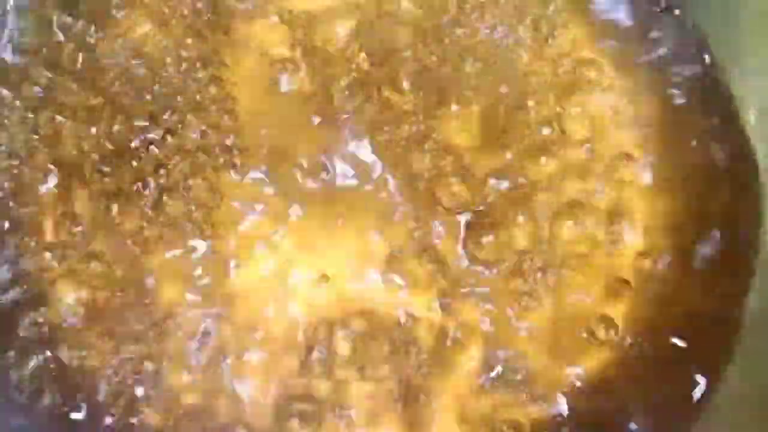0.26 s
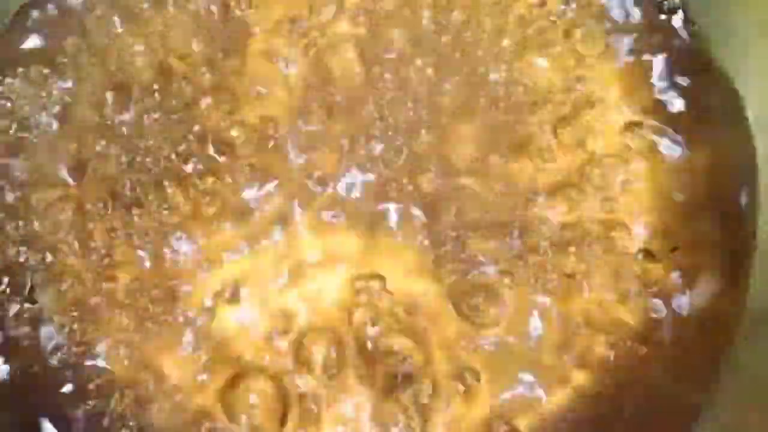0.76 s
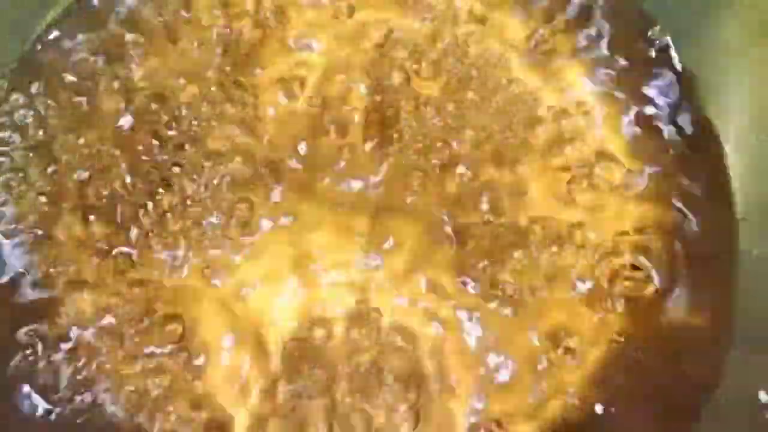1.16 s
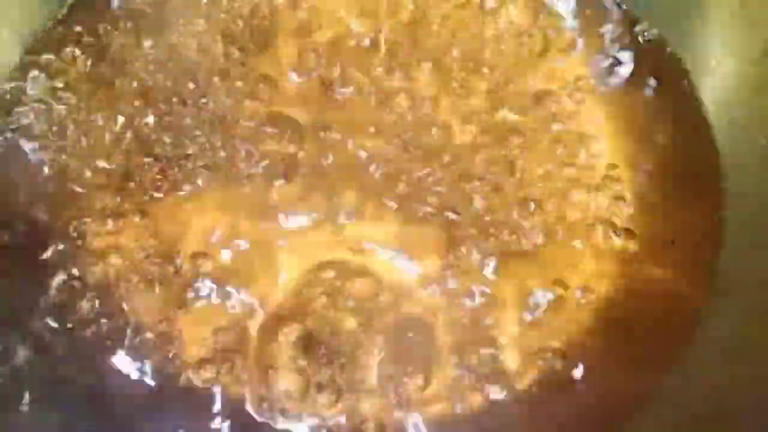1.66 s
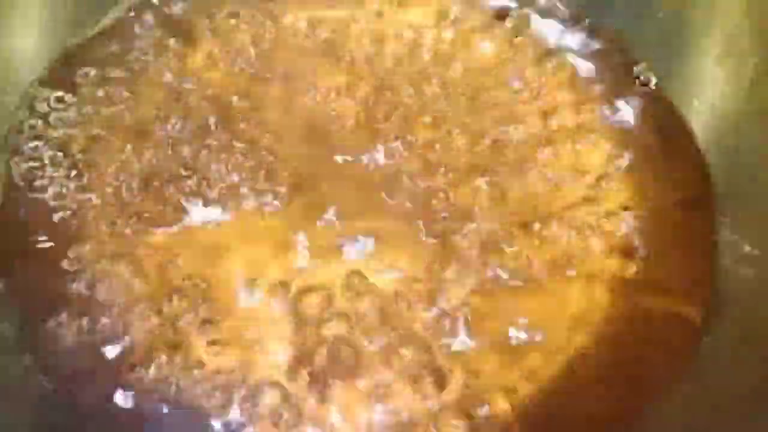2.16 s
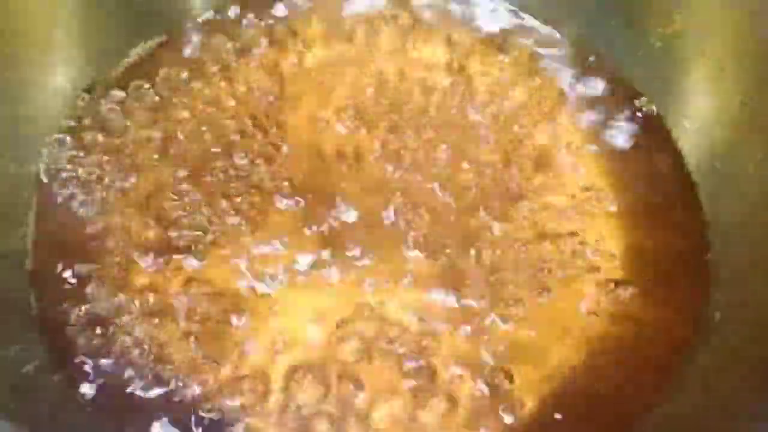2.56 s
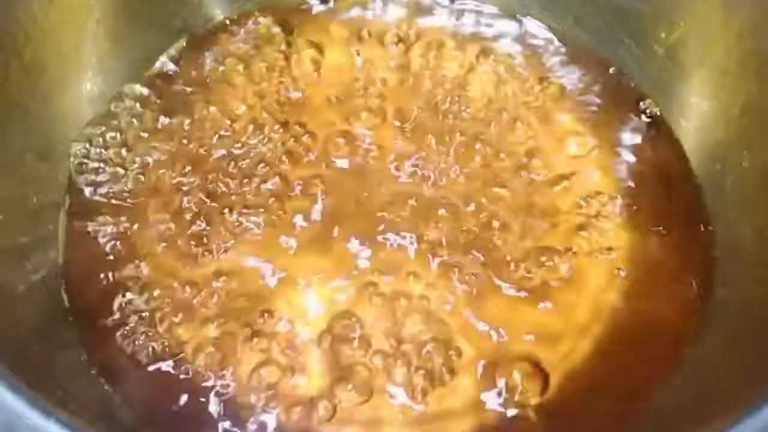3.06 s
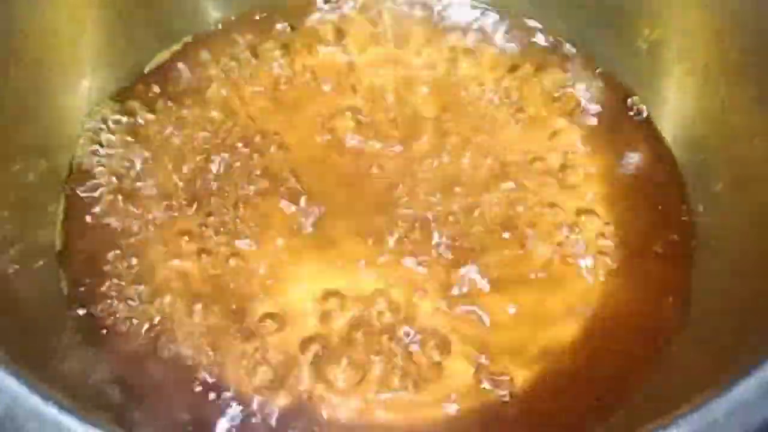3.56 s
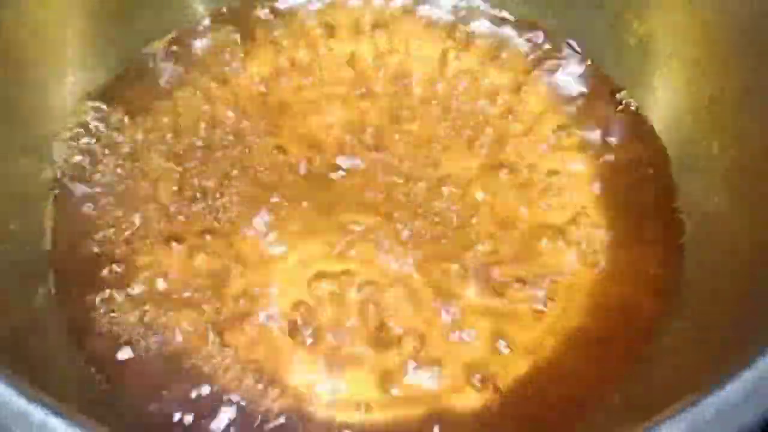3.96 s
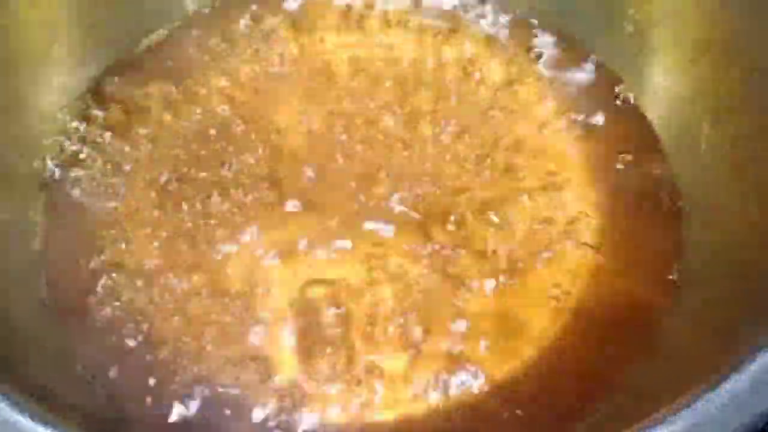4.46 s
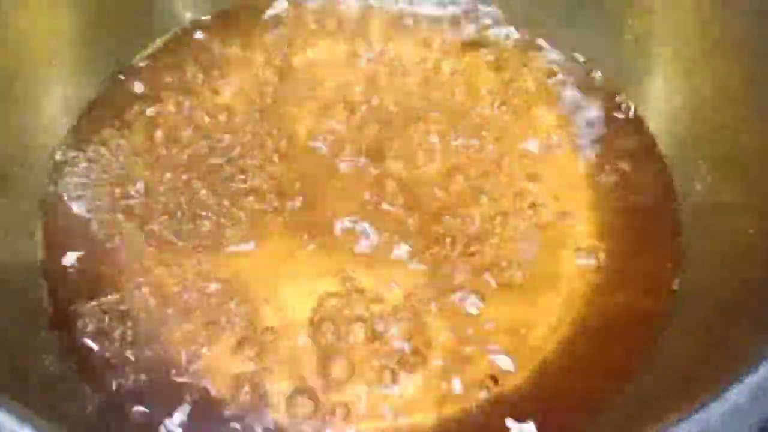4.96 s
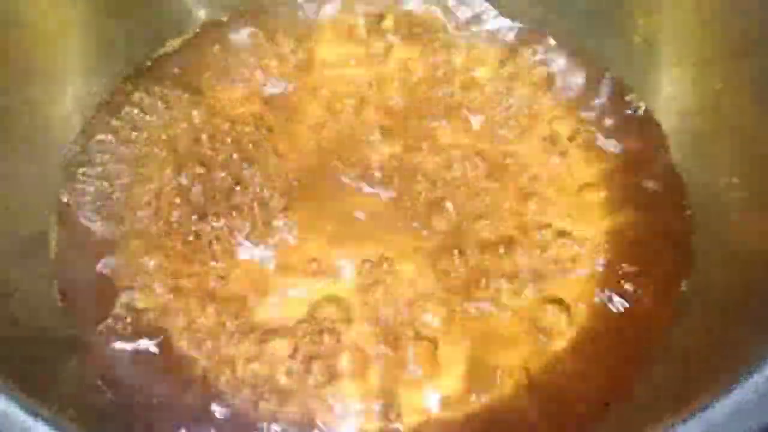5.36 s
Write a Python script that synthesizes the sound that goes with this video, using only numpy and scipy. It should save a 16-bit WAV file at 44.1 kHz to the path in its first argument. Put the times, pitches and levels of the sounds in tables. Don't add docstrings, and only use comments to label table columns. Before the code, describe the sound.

A vigorous sugar boil runs throughout: sizzling fizz, uneven and crackly, with soft low bubbling beneath. After almost five seconds come two quick metallic hits and a scraping drag, bright and ringing; then the boil returns with a faint falling squeak. Dry, near stereo phone sound, the right side hissier and briefly ducked by the hits.

```python
import sys
import numpy as np
from scipy import signal
from scipy.fft import rfft, irfft, next_fast_len
from scipy.io import wavfile
from scipy.ndimage import uniform_filter1d

SR = 44100
rng = np.random.default_rng(int(sys.argv[2]) if len(sys.argv) > 2 else 0)


def volts_from_db(level):
    exponent = np.asarray(level, float) / 20
    return 10 ** exponent


def master(y):
    cut = np.clip(np.atleast_2d(y).T, -1, 1)
    pcm = np.round(cut * 32767)
    wavfile.write(sys.argv[1], SR, pcm.astype(np.int16))


N = 246959
TIME = np.arange(N) / SR

# (time [s], level [dB])
HEAT = [(0, 0), (.6, 0.25), (1.9, -0.9), (2.6, 0), (3.1, -0.47), (4.2, 0.4), (4.7, 1.3), (5.6, 1)]
# (time [s], fizz [dB], rumble [dB])
SURGES = [(0.116, -0.5, -4.5), (0.169, 3, 4), (0.232, -1.5, 1), (0.428, -2.5, 1), (0.532, 3, 3),
          (0.605, -3.5, -3), (0.654, 3.5, 0.5), (0.783, 3, -3), (1.004, -2, -2), (1.133, 4, 0.7),
          (1.435, 2.5, 1.5), (1.559, -1.5, 1), (2.32, -2.5, -1), (2.53, 1.3, -0.5), (2.641, 3.5, 1.3),
          (3.062, 4, 4), (3.124, -2, -1), (3.185, 1.7, 0.5), (3.384, -2, 0), (3.551, 4, 3.5),
          (3.799, -3, -2.5), (3.847, 4.5, 5.5), (4.027, -1.5, -2.5), (4.174, -1.5, -2.5), (4.267, 3.5, 2.5),
          (4.383, 1.6, 0), (4.44, -2, -0.5), (4.513, -1.8, 6), (4.607, 4, -1.5), (4.69, -1.5, -7.5)]
SURGE_S = 0.011


def evened(x):
    return x / np.sqrt(np.mean(x ** 2, axis=-1, keepdims=True) + 1e-20)


def read(points, hz, order=1):
    table = np.transpose(points)
    return np.interp(np.log(hz + 1), np.log(table[0] + 1), table[order])


def along(rows):
    return np.interp(TIME, *np.transpose(rows))


def colour(x, gain_db):
    size = 4096
    hz = abs(np.fft.fftfreq(size, 1 / SR))
    log_gain = np.log(volts_from_db(np.maximum(gain_db(hz), -150)))
    taps = np.fft.ifft(np.exp(log_gain - 1j * signal.hilbert(log_gain).imag)).real
    return signal.oaconvolve(x, taps * np.sqrt(SR / 2))[:len(x)]


def flutter(low_hz, high_hz):
    t = TIME[::64]
    hz = np.geomspace(low_hz, high_hz, num=40)[:, None]
    waves = np.sin(2 * np.pi * (hz * t + rng.random(hz.shape))) * hz ** -.3
    return np.interp(TIME, t, evened(waves.sum(0)))


def bumps(s, db, width_s):
    t = TIME[::64]
    return np.interp(TIME, t, db @ np.exp(-.5 * ((t - s[:, None]) / width_s) ** 2))


def clicks(per_s, spread_db, wash, size=N):
    big = volts_from_db(spread_db * np.minimum(rng.exponential(1, size), 5)) * rng.choice([-1., 1.], size)
    bursts = evened(big * (rng.random(size) < per_s / SR))
    return np.sqrt(1 - wash) * bursts + np.sqrt(wash) * rng.standard_normal(size)


def blips(per_s, db):
    out = np.zeros(N)
    for hz in np.geomspace(250, 1500, num=10):
        cycles = hz * np.arange(round(7 * SR / hz)) / SR
        shape = np.sin(2 * np.pi * cycles * (1 + 0.036 * cycles)) * cycles * np.exp(-cycles / 1.15)
        shape /= np.linalg.norm(shape)
        out += signal.oaconvolve(clicks(per_s / 10, 2.3, 0), shape)[:N] * np.sqrt(hz)
    return volts_from_db(db) * evened(out)


def boil():
    # (frequency [Hz], density [dB per Hz])
    boil_left = [(30, -97), (70, -95), (130, -79), (200, -83.5), (280, -80.5), (450, -76), (540, -81.5),
                 (720, -78.5), (950, -77.5), (1150, -83), (1400, -81), (1700, -82.5), (2000, -96.5)]
    boil_right = [(30, -97), (70, -90.5), (130, -77.5), (200, -80.5), (280, -83.5), (450, -76),
                  (540, -76.5), (720, -80.5), (950, -78.5), (1150, -82), (1400, -82), (1700, -92.5),
                  (2000, -87)]
    # (frequency [Hz], correlation [-1..1])
    likeness = [(60, .9), (130, 0.85), (290, 1), (640, 0.98), (1410, .6), (3100, 0.092), (6820, 0.01),
                (15000, -0.1)]
    # (frequency [Hz], width [Hz], left lift [dB], right lift [dB])
    hollows = [(131.3, 13, 3, -3.5), (266.7, 30, 8.5, 9), (345.3, 16, 8, 9.5), (378, 7.8, 10, 10),
               (601.5, 13, 11.5, 1), (643, 22, 9.5, 0.5), (822, 47, 5.5, 7), (1514.4, 24.4, -2.5, 20),
               (1539, 14, 11.5, 3.5)]
    # (time [s], level [dB])
    small_bubbles = [(0, 4.5), (2, 3), (3.5, -3.5), (5.25, -3), (5.6, 2)]
    # (time [s], level [dB])
    heaves = [
        (0.0, 4),
        (.045, -3),
        (.69, 3),
        (1.051, 6),
        (3.501, 4.5),
        (4.51, -2),
    ]
    heave_s, churn_follows, port_lag_n = 0.0086, 0.67, 8
    hop, size = 256, 2048
    frames, hz = N // hop + 10, np.fft.rfftfreq(size, 1 / SR)[:160]

    a, b, c, d, patches = rng.standard_normal((frames, len(hz), 5)).T
    patches = uniform_filter1d(uniform_filter1d(patches, size=8, axis=0), size=10, axis=1)
    small_db = np.interp((np.arange(frames) - 4) * hop / SR, *np.transpose(small_bubbles))
    small_db = small_db * np.exp(-(np.log(hz[:, None] / 720 + 1e-9) / 0.2) ** 2)
    same, left = np.clip(read(likeness, hz), -1, 1)[:, None], a + 1j * b
    right = same * left + np.sqrt(1 - same ** 2) * (c + 1j * d)
    z = np.array([left, right]) * volts_from_db(0.72 * patches / patches.std() + small_db)
    z = np.pad(z, ((0, 0), (0, size // 2 + 1 - len(hz)), (0, 0)))
    noise = signal.istft(z, nperseg=size, noverlap=size - hop)[1][:, :N]
    white = (evened(noise) + blips(150, db=-8.5)) * np.sqrt(hz[-1] / (SR / 2))
    white[1] = np.roll(white[1], port_lag_n)

    s, _, surge_db = np.transpose(SURGES)
    churn_db = churn_follows * along(HEAT) + bumps(s, surge_db, SURGE_S)
    churn_db += bumps(*np.transpose(heaves), heave_s)
    white = white * volts_from_db(churn_db + .5 * flutter(4, 30))

    ports, size = [], next_fast_len(N)
    f = np.fft.rfftfreq(size, 1 / SR)
    for k, table in enumerate((boil_left, boil_right)):
        lift_db = sum(h[2 + k] / (1 + (2 * (f - h[0]) / h[1]) ** 2) for h in hollows)
        cut_db = 40 * np.maximum(np.log2((f + 1) / table[-1][0]), 0)
        gain = volts_from_db(read(table, f) - 2.0 + lift_db - cut_db) * np.sqrt(SR / 2)
        ports.append(irfft(rfft(white[k], size) * gain, size)[:N])
    return np.array(ports)


def walls(x, echo_db, last_s):
    taps = np.zeros(1024)
    at = (rng.uniform(.05, 1, 12) * min(last_s * SR, 1000)).astype(int)
    taps[at] = volts_from_db(echo_db) * rng.choice([-1., 1.], 12)
    taps[0] = 1
    return signal.oaconvolve(x, taps / np.linalg.norm(taps))[:N]


def fizz():
    # (frequency [Hz], density [dB per Hz])
    fizz_left = [(1900, -97), (2300, -87), (3200, -89), (3600, -84), (4600, -88), (5200, -87), (5650, -100),
                 (6200, -91), (7500, -91), (10500, -84.5), (12000, -90.5), (13500, -90), (14600, -92),
                 (15300, -90)]
    fizz_right = [(2000, -89), (2700, -79), (3700, -79), (4600, -80.5), (5600, -82.5), (6400, -73.5),
                  (7200, -64), (7900, -60), (8800, -65), (10200, -70), (11800, -78.5), (13500, -82),
                  (15000, -85.5), (15700, -89)]
    sizes_hz = ((10, 4500), (4500, 9500), (9500, 21000))
    s, surge_db, _ = np.transpose(SURGES)
    gust_db = along(HEAT) + bumps(s, surge_db, SURGE_S) + 0.9 * flutter(6.6, 60)
    ports = []
    for table, follow, db in ((fizz_left, .6, .1), (fizz_right, .9, -.1)):
        bursts = clicks(5000, 4.25, 0.76) * volts_from_db(db + follow * gust_db)
        spray = np.zeros(N)
        for band_hz in sizes_hz:
            sos = signal.butter(1, band_hz, "bandpass", fs=SR, output="sos")
            spray += signal.sosfiltfilt(sos, bursts) * volts_from_db(0.67 * flutter(3.3, 50))

        def port_db(hz):
            return read(table, hz) - 18 * np.maximum(np.log2(table[0][0] / (hz + 1)), 0)

        ports.append(colour(walls(spray, echo_db=-24, last_s=0.01), port_db))
    return np.array(ports)


def squeaks():
    # (start [s], length [s], pitch [Hz], glide [Hz per s], level [dB])
    rubs = [
        (4.707, 0.081, 807, -200, -49),
        (5.279, 0.27, 1122, -330, -50),
        (5.552, .1, 1370, 302, -53),
    ]
    out = np.zeros((2, N))
    for start, length, hz, glide, db in rubs:
        t = np.clip(TIME - start, 0, length)
        turns = np.cumsum((hz + glide * t) * (1 + .045 * flutter(10, 120))) / SR
        swell = np.sqrt(abs(np.sin(np.pi * t / length))) * (t < length)
        level = swell * volts_from_db(db + 2.5 * flutter(15, 80))
        tone, octave = np.sin(2 * np.pi * turns), np.sin(4 * np.pi * turns)
        out += np.sqrt(2) * level * np.array([volts_from_db(-4) * (tone + .3 * octave), tone + .45 * octave])
    return out


def rings():
    # (start [s], mode [Hz], left [dB], right [dB], t60 [s])
    taps = [
        (4.758, 3351, -30, -21.5, 0.55),
        (4.771, 4519, -23.5, -31, 0.36),
        (4.8, 12200, -23, -30, .3),
        (4.835, 9600, -18, -27, 0.11),
        (4.925, 4519, -32, -24, 0.25),
        (4.956, 2841, -41, -25, 0.98),
        (4.975, 5234, -44.5, -29.5, 2.4),
        (5.0, 7103, -57, -18.5, 0.81),
        (5.09, 3990, -54, -33, 0.33),
    ]
    damp_s, damp_db = 5.184, -10.5
    out = np.zeros((2, N))
    for start, hz, left_db, right_db, t60 in taps:
        at = round(start * SR)
        t = TIME[:min(N - at, SR // 2)]
        waver_db = 2.2 * np.sin(2 * np.pi * (rng.uniform(8.6, 21.3) * t + rng.random()))
        fade_db = -60 * t / t60 + damp_db * np.clip((t + start - damp_s) / 0.011, 0, 1) + waver_db
        tone = np.sin(2 * np.pi * (hz * t + rng.random((2, 1)))) * np.minimum(t / .004, 1) * volts_from_db(fade_db)
        out[:, at:at + len(t)] += np.sqrt(2) * volts_from_db(np.array([[left_db], [right_db]])) * tone
    return out


def pressure(touch, db, blow_db, hold, sag_db, rise, release, lag, blow_s):
    t = TIME - touch
    shape_db = rise * np.minimum(t, 0) - sag_db * np.clip(t / hold, 0, 1) ** 2
    shape_db -= release * np.maximum(t - hold, 0)
    return volts_from_db(db + shape_db + blow_db * np.exp(-.5 * ((t - lag) / blow_s) ** 2))


def spatula():
    # (touch [s], force [dB], first blow [dB], hold [s], sag over the hold [dB])
    moves = [
        (4.761, 3, 2, 0.067, 5),
        (4.838, 3, 0.5, 0.1, 9),
        (4.939, 5.5, 3, 0.28, 20),
    ]
    # (left [dB], right [dB])
    move_port_db = [
        (-1, 14),
        (4.5, 8),
        (-7.5, 4.1),
    ]
    # (frequency [Hz], width [Hz])
    pan_modes = [(850, 50), (1118, 35), (1515, 40), (1730, 90), (2841, 10), (3351, 16), (3640, 30),
                 (3990, 20), (4519, 16), (5234, 8), (5765, 16), (6212, 25), (7103, 60), (7500, 60),
                 (7810, 40), (8344, 60), (9117, 20), (9519, 20), (9680, 40), (10190, 20), (11000, 40),
                 (12200, 12), (12600, 50), (13135, 35), (13800, 40), (14690, 50)]
    # (strike [dB], knock [dB], drag [dB], left minus right [dB])
    speak_db = [(-72, -59, -62.5, 10), (-57, -51.5, -54, 8.5), (-65, -53, -51.5, 10.5),
                (-62, -44.5, -45.5, 4), (-51, -64, -53, 5), (-52.5, -45, -44.5, 3), (-48, -46.5, -51, 3.5),
                (-43, -60, -46, -10), (-48, -52, -41.5, -1), (-42.5, -51.5, -55, 3.5),
                (-35, -37, -37.5, -6), (-38, -43, -47, -19), (-22.5, -26, -25.5, -18.5),
                (-26.5, -44, -38, -15), (-36, -54, -43, -19), (-26, -21.5, -28, -16),
                (-35, -24, -54, -18.5), (-28, -36, -45, -10), (-46, -26, -33.5, -9), (-29.5, -38, -52, -6),
                (-39, -42.5, -45, 1), (-42, -60, -49, 5.5), (-31, -45, -55, -13), (-52, -49, -50, -6),
                (-49, -37.5, -49, -5), (-58, -39, -66, -11)]
    # (frequency [Hz], strike, knock, drag [dB per Hz], left minus right [dB])
    scratch = [(497, -92, -91, -93.5, -4.5), (1013, -91, -91, -95.5, -5), (2165, -71.5, -76, -71, -1.5),
               (2990, -67, -72, -71.5, 3.5), (3500, -63.5, -72, -69.5, -2.8), (3940, -71, -75.5, -74, -3),
               (4300, -65.5, -70, -67.5, 2), (4910, -79, -80.5, -75.5, -2.5), (5420, -64, -65, -66.5, -6),
               (7100, -58, -67, -65, -23), (8350, -65, -56, -56, -19), (9600, -69, -68, -69.5, -20),
               (11400, -74, -65, -73.5, -3.5), (13600, -70, -72, -80, -0.5),
               (14900, -75, -88.5, -99, -14.5)]
    rise_db_per_s, release_db_per_s = (3000, 646, 858), (520, 190, 144)
    blow_lag_s, blow_s = (0.012, 0.0043, 0.074), (0.0029, 0.0014, 0.024)
    shade_db = -4

    start = round(4.6 * SR)
    t, size, out = TIME[start:], N - start, np.zeros((2, N))
    judder = volts_from_db(.9 * flutter(20, 150))
    rules = zip(moves, rise_db_per_s, release_db_per_s, blow_lag_s, blow_s)
    forces = np.array([pressure(*row, *rule) * judder for row, *rule in rules])[:, start:]
    shade = np.clip((moves[0][0] - t) / blow_lag_s[0] + 1, 0, 1)
    for port, (side, blur) in enumerate(((0.93, 1.06), (0.013, 1.35))):
        force = forces * volts_from_db(np.array(move_port_db)[:, port])[:, None]
        force[0] *= volts_from_db(side * shade_db * shade)
        for (hz, width), (*levels_db, lean_db) in zip(pan_modes, speak_db):
            width_hz = width * blur * (1 + (side + .25) * (hz / 7000) ** 2)
            r = np.exp(-np.pi * width_hz / SR)
            drive = np.sqrt(volts_from_db(np.array(levels_db) + side * lean_db) ** 2 @ force ** 2)
            drive *= volts_from_db(-8e-3 * max(hz - 6000, 0) * np.maximum(t - 4.98, 0))
            slips = drive * clicks(1700, 3.5, 0.43, size=size)
            ring = signal.lfilter([1], [1, -r * np.exp(2j * np.pi * hz / SR)], slips)
            stored = np.sqrt(signal.lfilter([1], [1, -r ** 2], drive ** 2))
            ring *= (stored / (abs(ring) + 1e-12)) ** (.4 - .35 * side)
            out[port, start:] += ring.real * np.sqrt(2 * (1 - r ** 2))
        for k in range(3):

            def grit_db(hz):
                return read(scratch, hz, order=k + 1) + side * read(scratch, hz, order=4)

            out[port, start:] += colour(force[k] * clicks(6000, 1.0, 0.61, size=size), grit_db)
    return out


def scene():
    lowcut = signal.butter(3, 500, "highpass", fs=SR, output="sos")
    return fizz() + boil() + signal.sosfilt(lowcut, spatula()) + rings() + squeaks()


def gate(x):
    # (frequency [Hz], left [dB], right [dB])
    gate_db = [(800, -40, -40), (1500, -9, -9), (1887, -6.5, -5.5), (2300, -6, -6.5), (3050, -3.5, -9),
               (4020, -4.5, -7.5), (4950, -4.5, -9), (5600, -6, -12), (6500, -5, -14), (8000, -6, -20),
               (10500, -8.5, -16), (12000, -6, -12), (13200, -1.5, -10), (14200, 2, -10), (15000, 5.5, -8),
               (15400, 9, -1.5), (15700, 14, 8)]
    # (frequency [Hz], left [dB], right [dB])
    over_step_db = [(100, 25, 25), (400, 18, 18), (800, 11, 11), (1100, 2, 2), (1500, -3.5, -3.5),
                    (2200, -4.5, -4.5), (3000, -3.5, -4), (5000, -3.5, -4), (6000, -3.5, 4),
                    (7500, -2.5, 13), (9600, -2.5, 11), (11500, -3.5, -0.5), (13000, -4, -2.5),
                    (15000, -5, -4.5)]
    # (time [s], left [Hz], right [Hz])
    top_sinks = [
        (4.74, 0, 0),
        (4.77, -2500, 100),
        (4.93, -2500, 600),
        (4.96, 1604, 703),
        (5.02, 1600, 1300),
        (5.1, 1095, 1000),
        (5.14, 500, 300),
        (5.25, 0, 0),
    ]
    left_top_hz, hop, band = 15250, 1024, 8
    frames, lead = N // hop + 3, hop - 807
    n, k = np.arange(2 * hop)[:, None] + .5, np.arange(hop) + .5
    basis = np.sin(np.pi * n / (2 * hop)) * np.cos(np.pi / hop * (n + hop / 2) * k) * np.sqrt(2 / hop)
    cut = np.pad(x, ((0, 0), (lead + hop, (frames + 1) * hop - N - lead - hop))).reshape(2, -1, hop)
    z = np.concatenate([cut[:, :-1], cut[:, 1:]], axis=2) @ basis

    narrow_db = 10 * np.log10((z ** 2).reshape(2, frames, -1, band).mean(3) + 1e-20)
    wide_db = uniform_filter1d(narrow_db, size=11, axis=2)
    luck = uniform_filter1d(rng.standard_normal(narrow_db.shape[1:]), size=3, axis=0)
    luck = uniform_filter1d(luck, size=2, axis=1)
    luck = luck / luck.std()
    hz = (np.arange(hop // band) + .5) * band * SR / (2 * hop)
    s = (np.arange(frames) * hop - lead) / SR
    sink_s, *sinks_hz = np.transpose(top_sinks)
    for port in range(2):
        sink_hz = np.interp(s, sink_s, sinks_hz[port])[:, None]
        limit_db = read(gate_db, hz + sink_hz * np.clip((hz - 11500) / 1500, 0, 1), order=1 + port)
        shut = narrow_db[port] - wide_db[port] + 3.0 * luck < limit_db
        shut = shut | ((hz > left_top_hz) & (port == 0))
        step = volts_from_db(wide_db[port] - read(over_step_db, hz, order=1 + port) - 1.2 * luck)
        step = np.repeat(step, band, axis=1)
        rounded = np.sign(z[port]) * step * np.floor(abs(z[port]) / step + .4)
        z[port] = rounded * np.repeat(~shut, band, axis=1)
    y = z @ basis.T
    return (y[:, :-1, hop:] + y[:, 1:, :hop]).reshape(2, -1)[:, lead:lead + N]


def roll_off(x):
    return signal.sosfilt(signal.butter(12, 15640, fs=SR, output="sos"), x)


def record(dry):
    duck_from_db, duck_share, duck_smooth_s, recover_db_per_s = -20.5, 0.6, 0.0029, 105
    ceiling, converter_offset = 0.68, .00045
    power = uniform_filter1d(dry[1] ** 2, round(duck_smooth_s * SR))
    power_db = 10 * np.log10(abs(power) + 1e-12)
    fall_db = recover_db_per_s * TIME
    held_db = np.maximum.accumulate(power_db + fall_db) - fall_db
    over_db = np.maximum(held_db - duck_from_db, 0)
    gain = np.array([np.ones(N), volts_from_db(-duck_share * uniform_filter1d(over_db, size=200))])
    rounded = ceiling * np.tanh(dry * gain / ceiling)
    return roll_off(gate(rounded) + converter_offset)


dry = scene()
out = record(dry)
master(out)
```